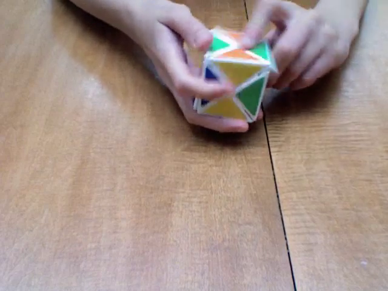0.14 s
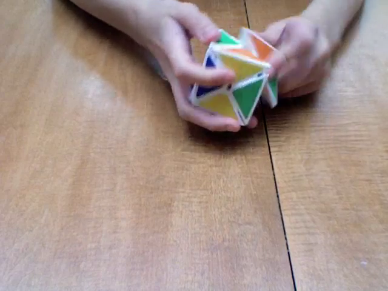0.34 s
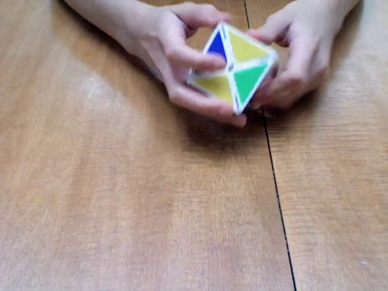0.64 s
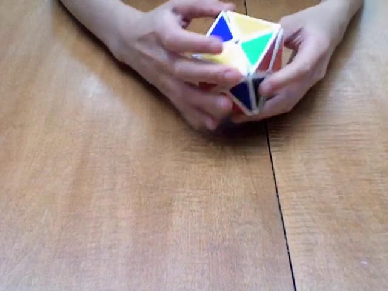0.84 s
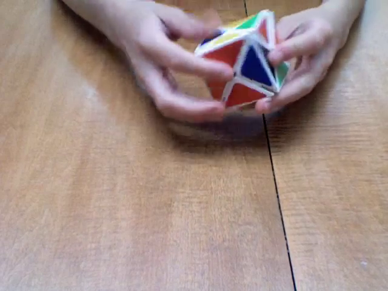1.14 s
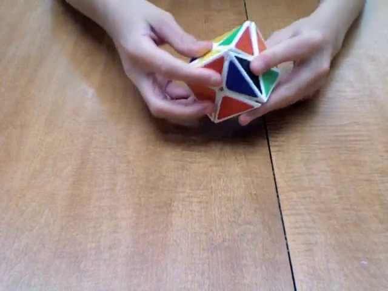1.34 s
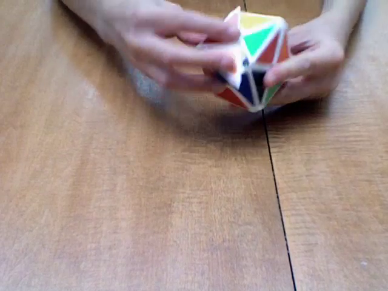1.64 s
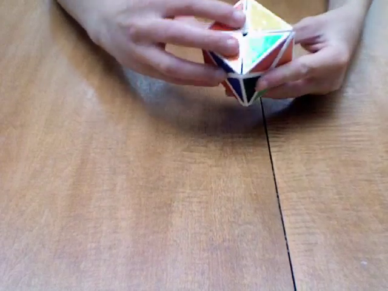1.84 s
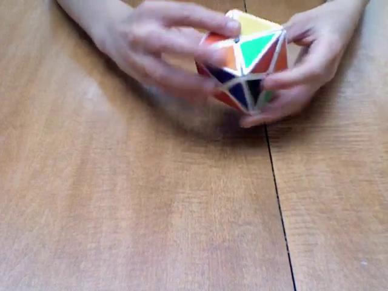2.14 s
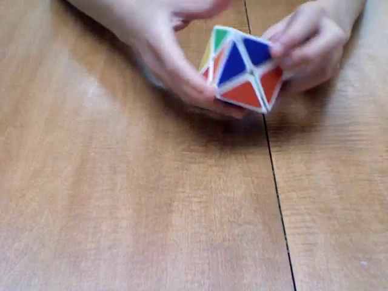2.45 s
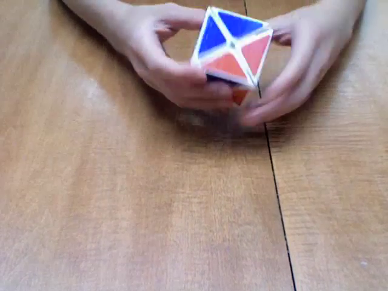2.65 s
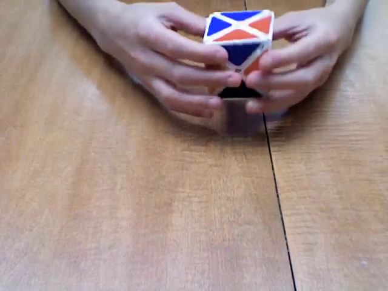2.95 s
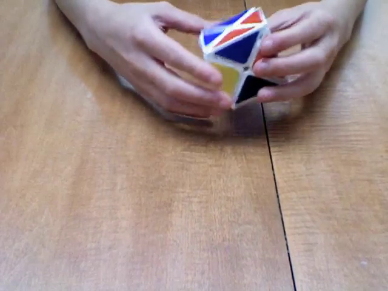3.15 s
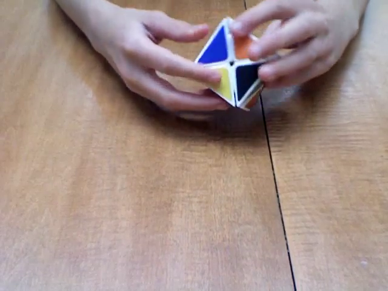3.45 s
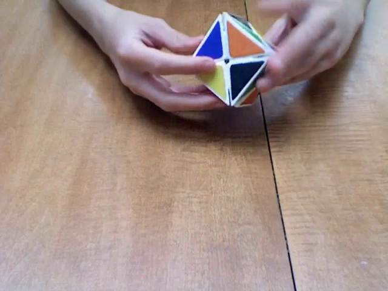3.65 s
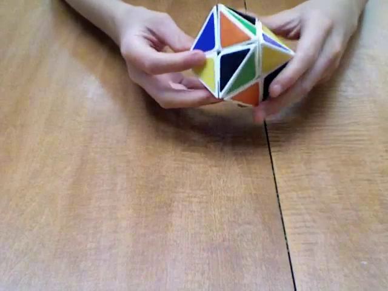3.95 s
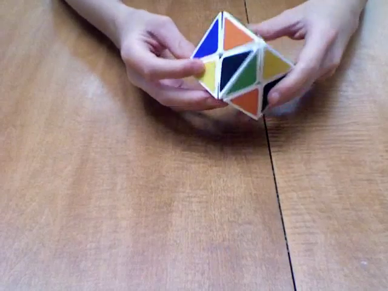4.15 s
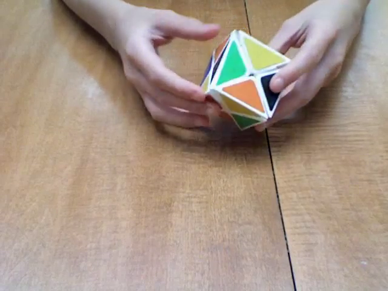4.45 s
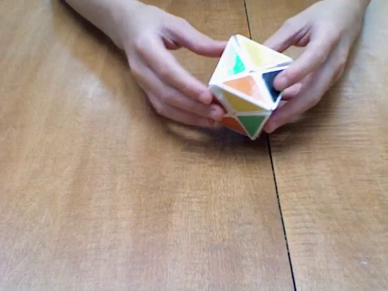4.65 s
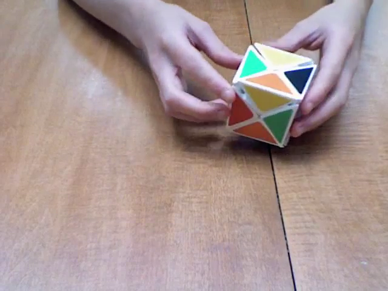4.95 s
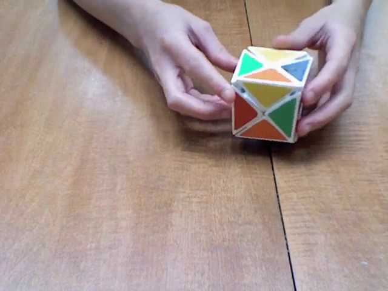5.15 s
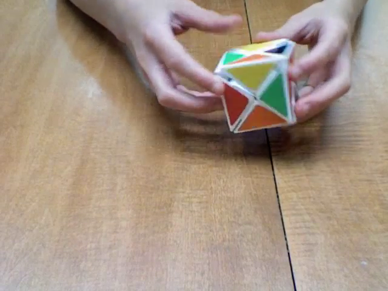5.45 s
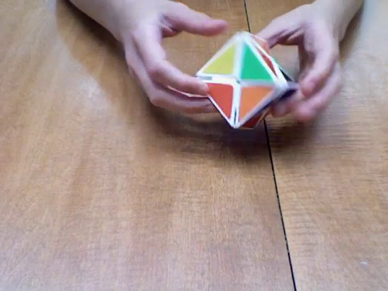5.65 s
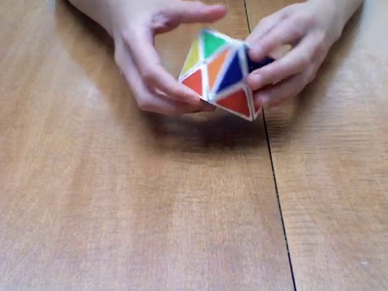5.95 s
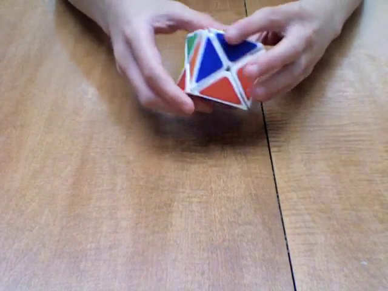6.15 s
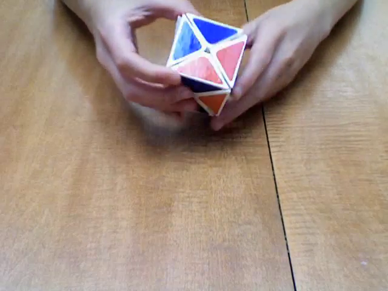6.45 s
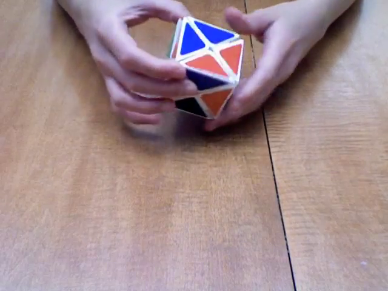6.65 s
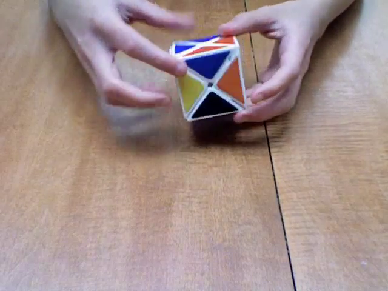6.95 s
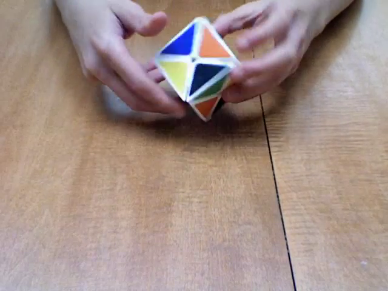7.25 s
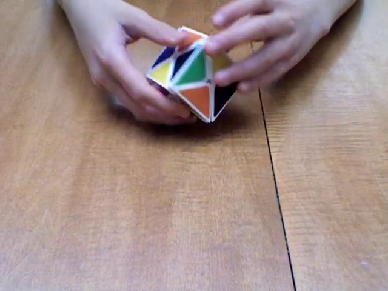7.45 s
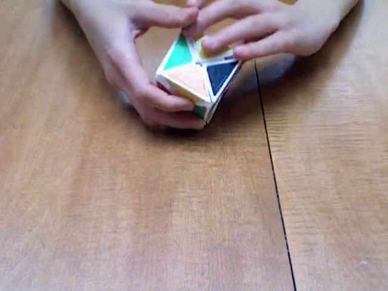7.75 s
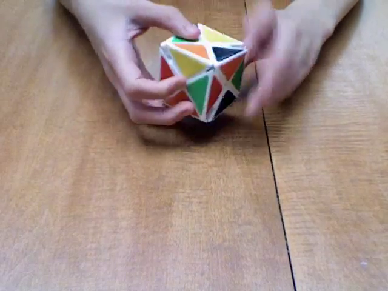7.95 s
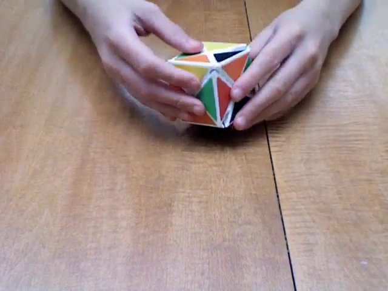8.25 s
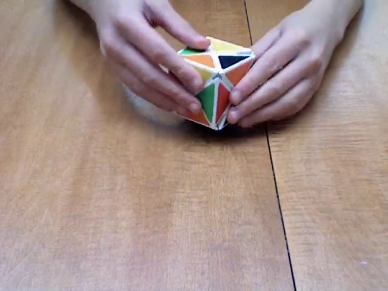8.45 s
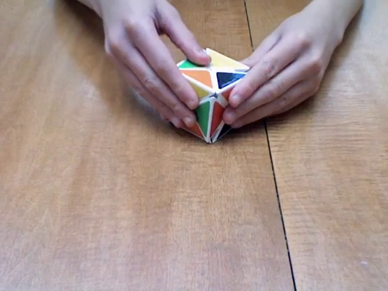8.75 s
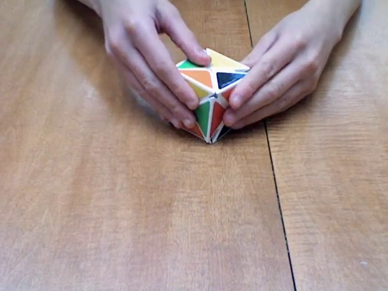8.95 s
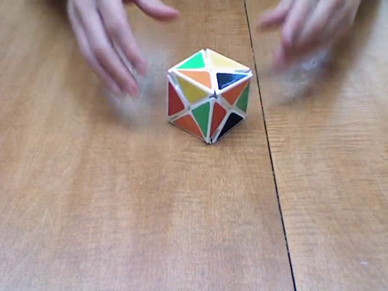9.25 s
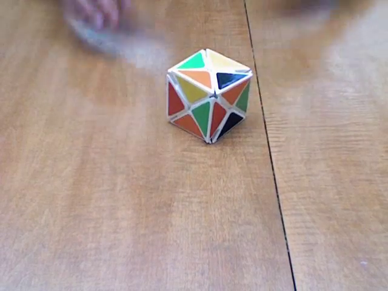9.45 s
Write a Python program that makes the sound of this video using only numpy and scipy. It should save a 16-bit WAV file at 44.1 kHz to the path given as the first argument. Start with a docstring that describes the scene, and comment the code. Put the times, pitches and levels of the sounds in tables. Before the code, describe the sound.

Close to the microphone a motor hums and a fan drones with a faint high whine throughout. Hands twist a small resin puzzle, giving quick dry clicks and scratchy rubs, busiest in the first two seconds, then sparse. Forearms softly brush the wooden table. Late on, the puzzle lands with a hard knock, and a final low thump booms in the boards.

```python
"""Close to the microphone a drive motor hums, a fan drones and the electronics whine faintly throughout.
From the start hands twist a small resin puzzle cube above a wooden table: filtered noise bursts click,
streams of tiny slips rub, and forearms brush the wood in swells of low noise.
Late on, the cube is set down with a hard knock, made of a push, ringing table modes and bursts of noise.
A last thump booms in the boards as the hands let go."""
import sys
import numpy as np
from scipy import signal
from scipy.fft import rfft, irfft, next_fast_len
from scipy.io import wavfile

SR = 44100
rng = np.random.default_rng(int(sys.argv[2]) if len(sys.argv) > 2 else 0)


def transcribe(signal):
    """Save signal, clipped to [-1, 1], as a 16-bit WAV file at the path in sys.argv[1]."""
    frames = np.atleast_2d(signal).T
    limited = np.clip(frames, -1, 1)
    pcm = np.round(limited * 32767).astype(np.int16)
    wavfile.write(sys.argv[1], SR, pcm)


N = 423360


def amp(db):
    """Decibels to gain."""
    return 10 ** (np.asarray(db) / 20)


def unit(x):
    """x scaled to rms 1."""
    return x / np.sqrt(np.mean(x ** 2) + 1e-20)


def shape(points, hz):
    """Gain of an EQ curve of (f/Hz, level/dB) points joined on a log frequency axis."""
    f, db = np.transpose(points)
    return amp(np.interp(np.log(hz + 1), np.log(f), db))


def filtered(x, response):
    """x filtered by a response given as a function of frequency in Hz."""
    m = next_fast_len(len(x) + SR // 10)  # padded so the end does not wrap onto the start
    spectrum = rfft(x, m) * response(np.fft.rfftfreq(m, 1 / SR))
    return irfft(spectrum, m)[:len(x)]


def noise(points, size):
    """Noise of rms 1 with its spectrum drawn by (f/Hz, level/dB) points."""
    return unit(filtered(rng.standard_normal(size), lambda hz: shape(points, hz)))


def wobble(rate):
    """A random curve of straight segments, with rate knots a second."""
    knots = rng.standard_normal(int(N * rate / SR) + 4)
    return np.interp(np.arange(N) * rate / SR, np.arange(len(knots)), knots)


def add(track, s, sound):
    """Mix a sound into the track at s seconds."""
    start = round(s * SR)
    track[start:start + len(sound)] += sound[:N - start]


def tones(lines, clock, scatter):
    """Sines of (f/Hz, level/dB rms) on a clock in s; little phase scatter (cycles) joins them into pulses."""
    out = np.zeros(len(clock))
    for hz, db in lines:
        turns = hz * clock + scatter * rng.standard_normal()
        phase = np.float32(2 * np.pi * (turns - np.floor(turns)))
        out += amp(db) * np.sqrt(2) * np.cos(phase)
    return out


def contact(hz, softness):
    """Gain of a contact, which passes only frequencies slower than its softness in seconds."""
    return 1 / np.sqrt(1 + (np.pi * hz * softness) ** 6)


def stroke(s, rise_s, fall_s):
    """Gain of a sliding move: it swells 20 dB in rise_s up to time s, then falls 20 dB in each fall_s."""
    t = np.arange(N) / SR - s
    return amp(-20 * np.minimum(np.maximum(-t / rise_s, t / fall_s), 10))


# Spectrum of the fan wash and hiss: f/Hz, level/dB per Hz
AIR_SPECTRUM = [(20, -86), (45, -73.5), (60, -70), (85, -69), (105, -64.5), (135, -71), (330, -72.5),
                (450, -77.5), (700, -73), (870, -78), (1500, -83), (3000, -89), (6500, -95), (15500, -94)]


def air():
    """Fan wash and microphone hiss: steady noise through one EQ curve."""
    return filtered(rng.standard_normal(N), lambda hz: shape(AIR_SPECTRUM, hz)) * np.sqrt(SR / 2)


# Steady electronic whistles: f/Hz, level/dB rms
WHINE_TONES = [(8000, -58.0), (9456, -68.5), (9864, -66.5), (9893, -72), (11053, -75), (12196, -67),
               (12509, -70.4), (12947, -68), (13698, -72.1), (15248, -68)]
# EQ curve over the fine comb of electronic buzz: f/Hz, relative level/dB
BUZZ_SPECTRUM = [(5000, -37), (8300, 3), (9000, -5), (9650, 1), (10200, -4.5), (12200, 1), (14000, -6),
                 (14700, -11), (15400, -13)]


def electronics(buzz_db=-58):
    """Steady whistles, and interference whose noise pattern repeats 29.6 times a second as a fine comb."""
    pattern = rng.standard_normal(round(SR / 29.6))
    buzz = noise_loop = np.resize(pattern, N)
    buzz = unit(filtered(noise_loop, lambda hz: shape(BUZZ_SPECTRUM, hz)))
    whine = tones(WHINE_TONES, np.arange(N) / SR, scatter=0.91)
    return whine + amp(buzz_db) * buzz


MOTOR_HZ = 213.68  # pitch of the motor
# Partials of the motor hum: multiple of its pitch, level/dB rms
MOTOR_PARTIALS = [(1, -53), (2, -37), (3, -47), (5, -59.5), (6, -55), (7, -52), (8, -64.5), (9, -50),
                  (10, -54), (11, -64), (13, -77.5), (14, -57), (15, -60.5), (16, -63), (17, -66),
                  (18, -64), (19, -69.5), (21, -63.5), (22, -57.5), (23, -60), (25, -60.5), (26, -57),
                  (27, -62), (29, -68.5), (30, -68.5), (34, -75), (37, -71)]
# Fan and machine tones: f/Hz, level/dB rms
FAN_TONES = [(54.6, -69), (59.8, -58), (72, -56), (90.1, -35.0), (188.2, -58.5), (218.4, -58), (491, -59),
             (873.5, -60), (1038, -58.5), (1529, -61.5), (1966, -61.5)]


def machines():
    """The motor gives one smeared pulse a cycle and holds its speed tightly; the fan wanders a little."""
    motor_clock = np.cumsum(1 + .00007 * wobble(1.45)) / SR
    fan_clock = np.cumsum(1 + 0.000903 * wobble(1.22)) / SR
    turn = np.linspace(0, 1, 4096)  # one motor cycle
    pulse = tones([(round(k), db) for k, db in MOTOR_PARTIALS], turn, scatter=.075)
    motor = np.interp(motor_clock * MOTOR_HZ % 1, turn, pulse)
    # a close neighbour makes the 3 kHz partial waver
    beating = tones([(2987.5, -67)], motor_clock, scatter=1)
    return motor + beating + tones(FAN_TONES, fan_clock, scatter=1)


# A forearm brushing the table: t/s of strongest drag, run-up/s, level/dB rms at the strongest drag
# before the random unevenness
ARM_BRUSHES = [(0.38, 0.24, -40), (1.22, 0.21, -40), (1.68, 0.47, -46), (3.02, .1, -39), (8.1, .25, -52),
               (9.08, 0.18, -37), (9.58, .3, -46)]
# Dull rumble of the brushed boards: f/Hz, relative level/dB
BRUSH_RUMBLE = [(18, -12), (30, -9), (65, 4), (105, -9), (140, 6.5), (200, 3.5), (330, -2.5), (650, -1),
                (900, -22), (2000, -45), (5000, -80)]
BRUSH_FADE_SHARE = 1.9  # a brush's 20 dB fade time over its run-up


def arms(uneven_db=1.5):
    """Skin dragging on the boards gives an uneven low rumble that swells and fades with each brush."""
    drag = np.zeros(N)
    for s, run_up, db in ARM_BRUSHES:
        drag += amp(db) * stroke(s, run_up, BRUSH_FADE_SHARE * run_up)
    return drag * amp(uneven_db * wobble(25)) * noise(BRUSH_RUMBLE, size=N)


# Resonances of the cube: f/Hz, width/Hz, level/dB
CUBE_RESONANCES = [(1012, 130, -2), (1360, 240, 5.5), (1520, 295, 4.5), (2320, 520, -8), (2980, 760, -12.5),
                   (3710, 430, -6), (4800, 500, -10.5), (6260, 440, -14.5), (7400, 780, -18.5),
                   (8630, 550, -13.5), (12700, 4000, -33)]


def resin(hz, shift=0, vary_db=0):
    """Causal response of the cube; shift and vary_db detune and reweight its resonances at random."""
    response = 0
    for k, (centre, width, db) in enumerate(CUBE_RESONANCES):
        centre = centre * np.exp(shift * rng.standard_normal())
        gain = (-1) ** k * amp(db + vary_db * rng.standard_normal())  # alternating polarity
        response = response + gain * 1j * hz * width / (centre ** 2 - hz ** 2 + 1j * hz * width)
    return response


# The cube's hollow body, hard edge and fine tick: pass bands, low and high f/Hz
BANDS = [signal.butter(3, band, "bandpass", fs=SR, output="sos")
         for band in [(900, 2200), (2200, 7000), (7000, 15500)]]


def cube_bands(force, shift=0, vary_db=0):
    """The cube's resonant answer to a force, split into body, edge and tick."""
    answer = irfft(resin(np.fft.rfftfreq(1024, 1 / SR), shift, vary_db))
    ring = signal.oaconvolve(force, answer)[:len(force)]
    return [signal.sosfilt(band, ring) for band in BANDS]


# Twists, each sliding faster until the face stops: t/s of fastest slide, run-up/s,
# body level/dB, hiss level/dB (both before the body and hiss trims in rubbing)
FACE_TWISTS = [(0.19, .04, -36.5, -52), (0.32, .08, -37, -62), (0.41, 0.058, -33.5, -55),
               (0.465, .1, -33, -42.5), (1.17, .08, -47, -48), (1.52, 0.15, -39, -52),
               (1.61, 0.15, -34, -58), (1.7, 0.13, -34.5, -50), (2.59, .08, -41, -60), (6.27, .1, -47, -68)]
TWIST_STOP_S = 0.076  # time for a slide to fall 20 dB
GRIP_BODY_DB, GRIP_HISS_DB = -69.5, -64  # fingers shifting between twists, before the same trims


def rubbing(grain_db=5, body_db=-1.5, hiss_db=-2, edge_db=-8):
    """Sliding faces shed a dense stream of tiny uneven slips into the cube's resonances."""
    body_gain, hiss_gain = amp(GRIP_BODY_DB), amp(GRIP_HISS_DB)
    for s, run_up, body_level, hiss_level in FACE_TWISTS:
        slide = stroke(s, run_up, TWIST_STOP_S)
        body_gain = np.hypot(body_gain, amp(body_level) * slide)
        hiss_gain = np.hypot(hiss_gain, amp(hiss_level) * slide)
    slips = rng.standard_normal(N) * amp(grain_db * wobble(260))
    body, edge, tick = map(unit, cube_bands(slips))
    low_rub = amp(body_db) * body_gain * (body + amp(edge_db) * edge)
    return low_rub + amp(hiss_db) * hiss_gain * tick


# Loose pieces tick faintly at random while the cube is in the hands
HANDLED_S = (0.3, 8.3)  # first and last possible time
LOOSE_DB, LOOSE_SPREAD_DB, LOOSE_SOFTNESS_S = -52.5, 2, .00003


def loose_ticks(count=12):
    """Random faint catches, as rows like those of the clicks."""
    return [(rng.uniform(*HANDLED_S), LOOSE_DB + LOOSE_SPREAD_DB * rng.standard_normal(), LOOSE_SOFTNESS_S)
            for _ in range(count)]


# Resin pieces catching and seating: t/s, level/dB before the part levels and dulling, contact softness/s
PIECE_CLICKS = [(0.1502, -41, .00012), (0.173, -35, 0.000038), (0.182, -39, .00005),
                (0.192, -31.5, 0.000053), (0.29, -36, 0.00006), (0.86, -33.5, 0.000043),
                (1.3155, -44, .00002), (1.531, -32, 0.000044), (1.5776, -21.5, .00005),
                (1.5924, -40, .00006), (1.679, -44, .00002), (1.6869, -40, .00005), (1.6958, -39, .000055),
                (2.062, -45, 0.000046), (2.1428, -39.5, 0.000043), (2.174, -35, 0.000085),
                (2.3648, -39, 0.000032), (2.5593, -42, .00014), (2.5913, -36.5, 0.000096),
                (2.783, -40.5, .000035), (2.908, -43, .000035), (3.3, -41, .00013), (3.8625, -39.5, .00005),
                (4.4469, -44, .00016), (6.214, -44, 0.000037), (6.2578, -42, .00014),
                (6.473, -35, 0.000044), (6.4951, -44.5, .00003), (6.646, -35, 0.00009),
                (6.832, -42, .00012), (7.3102, -43, .00003), (7.647, -45, .00002), (8.065, -45, .00002),
                (8.0796, -42.5, .00015), (8.5298, -42, .00012), (9.046, -34, .00015),
                (9.4046, -36.5, 0.000049)]
# How a click divides among the cube's body, edge and tick: centre f/Hz, level/dB
CLICK_BALANCE = [(1400, 0), (3800, -4.5), (9000, -1.5)]


def clicks(snap_t60=0.0088, tail_db=-26, tail_t60=0.074, seat_s=0.0018):
    """Each catch is a snap with a brief chatter of loose pieces and a faint room tail; a softer one is duller."""
    out, t = np.zeros(N), np.arange(SR // 10) / SR
    head = SR // 100  # levels are set over the first 10 ms
    for s, db, softness in PIECE_CLICKS + loose_ticks():
        snap, tail = rng.standard_normal((2, len(t)))
        force = snap * amp(-60 * t / snap_t60) + tail * amp(tail_db - 60 * t / tail_t60)
        force = force * (1 - np.exp(-t / seat_s))  # the pieces scrape briefly before they seat
        bands = cube_bands(force, shift=.03, vary_db=1.5)  # each grip varies the resonances a little
        for band, (hz, part_db) in zip(bands, CLICK_BALANCE):
            level = amp(db + part_db) * contact(hz, softness)
            add(out, s, level * band / np.std(band[:head]))
    return out


# Blows on the table: t/s, push level/dB, boom level/dB, contact softness/s, clack level/dB
# (levels scale each layer before its own shaping)
TABLE_BLOWS = [(7.6466, -27, -25, 0.00038, -37), (7.6551, -9.5, -18.5, 0.0009, -52),
               (7.6619, -16, -27, 0.00069, -60), (8.078, -29, -26, 0.002, -60),
               (8.6348, -12, -13, 0.00013, -21), (8.638, 0, -1.5, 0.00018, -8),
               (8.6476, -15, -20, 0.00053, -11), (9.021, -33, -30, 0.00032, -46),
               (9.047, -29, -23.5, 0.00052, -50), (9.058, -23, -40, 0.0008, -52),
               (9.3882, -2.5, -1, .0016, -60), (9.4053, -0.5, -7.5, 0.0011, -50),
               (9.4165, -13, -26, 0.0003, -10.5), (9.4271, -5.5, -5.5, 0.0016, -60)]
# Modes of the table: f/Hz, level/dB relative to the boom, t60/s
TABLE_MODES = [(36.3, -38, 0.49), (63.4, -21, 0.48), (76.2, -14, 0.4), (104.1, -1.5, 0.28),
               (155.8, -15, 0.066), (192, -17.5, 0.44), (217.6, -13.5, 0.3), (250.8, -6.5, 0.18),
               (321, -3, 0.073), (373, -11, 0.21), (394, -5.5, 0.082), (539, -5, 0.088), (590, -27, 0.67),
               (625, 7.5, 0.036), (834, -5.5, 0.082)]
# Dull clack of resin on wood: f/Hz, relative level/dB
CLACK_SPECTRUM = [(200, -17), (500, -3), (780, 6), (1100, 4.5), (1300, 0), (1550, 7), (1780, 4),
                  (2000, -34), (2500, -6), (4000, -20), (6500, -30), (10000, -50), (16000, -60)]
# Sharp crack of a hard corner landing: f/Hz, relative level/dB
CRACK_SPECTRUM = [(500, -20), (1500, -10), (2400, 7.5), (4000, -2), (6500, -12), (10000, -19), (16000, -30)]
# Dense upper ring of the boards and the room: f/Hz, relative level/dB
RATTLE_SPECTRUM = [(100, 6), (300, 8), (700, 11), (1100, -4.5), (1550, 0), (2500, -5), (3500, -7.5),
                   (4600, -20), (7000, -28), (16000, -46)]
# a contact this hard cracks as loud as it clacks; loss per doubling of softness
CRACK_SOFTNESS_S, CRACK_DB_PER_OCTAVE = .00017, 18
# upper ring over the boom; its loss per second of contact softness
RATTLE_DB, RATTLE_LOSS_DB_PER_S = -11, 36000


def knocks(swell_cycles=1.2, clack_t60=0.023, crack_t60=0.025, rattle_t60=0.55):
    """Every blow pushes the table top and rings its modes; a soft contact reaches only the low ones."""
    out, t = np.zeros(N), np.arange(SR * 3 // 5) / SR

    def burst(points, db, t60):
        """Shaped noise dying away by 60 dB in t60 seconds."""
        return noise(points, size=len(t)) * amp(db - 60 * t / t60)

    hz, db, t60 = np.transpose(TABLE_MODES)[:, :, None]
    swell = 1 - np.exp(-t * hz / swell_cycles)  # low bending waves take longer to fill the boards
    modes = swell * amp(db - 60 * t / t60) * np.sin(2 * np.pi * hz * t)
    for s, push_db, boom_db, softness, clack_db in TABLE_BLOWS:
        u = t / softness - 3.5
        push = -amp(push_db) * u * np.exp(-u * u / 2)  # the top gives and springs back during the contact
        boom = amp(boom_db) * np.sum(contact(hz, softness) * modes, axis=0)
        crack_db = clack_db - CRACK_DB_PER_OCTAVE * np.log2(softness / CRACK_SOFTNESS_S)
        rattle_db = boom_db + RATTLE_DB - RATTLE_LOSS_DB_PER_S * softness
        impact = burst(CLACK_SPECTRUM, clack_db, clack_t60) + burst(CRACK_SPECTRUM, crack_db, crack_t60)
        impact = impact * (1 - np.exp(-t / softness))  # clack and crack build up over the contact
        add(out, s, push + boom + impact + burst(RATTLE_SPECTRUM, rattle_db, rattle_t60))
    return out


def scene():
    """One microphone hears everything and feeds both channels."""
    background = air() + electronics() + machines()
    mono = background + arms() + rubbing() + clicks() + knocks()
    return np.array([mono, mono])


TOP_HZ = 15830  # upper band limit


def record(dry):
    """Peaks are rounded off smoothly at full scale, then the band is limited."""
    held = dry / (1 + np.abs(dry) ** 8) ** (1 / 8)
    return np.array([filtered(side, lambda hz: hz < TOP_HZ) for side in held])


dry = scene()
out = record(dry)
transcribe(out)
```